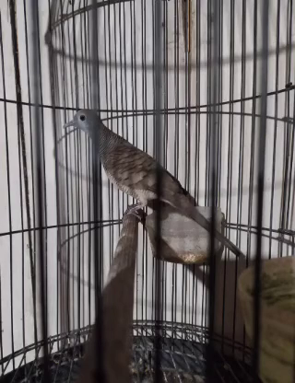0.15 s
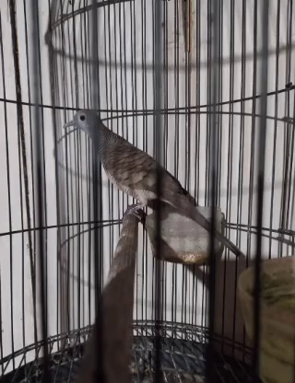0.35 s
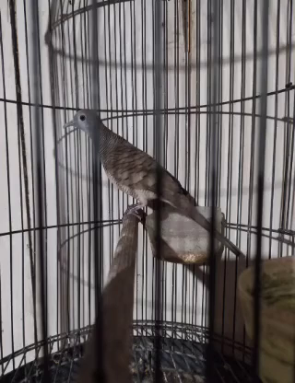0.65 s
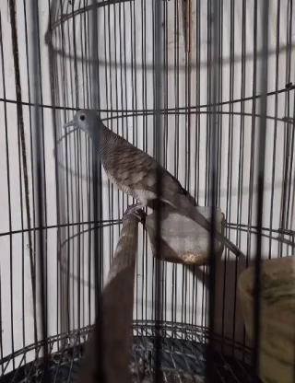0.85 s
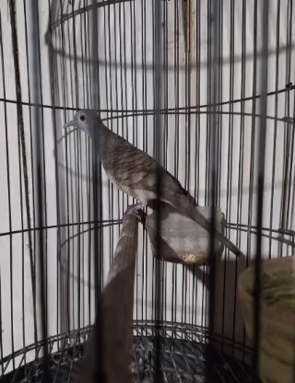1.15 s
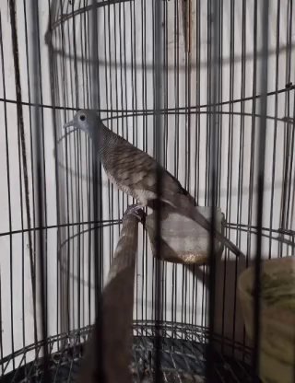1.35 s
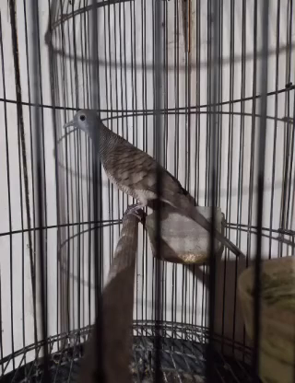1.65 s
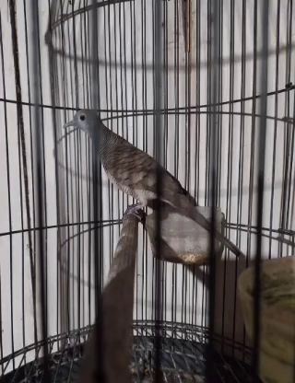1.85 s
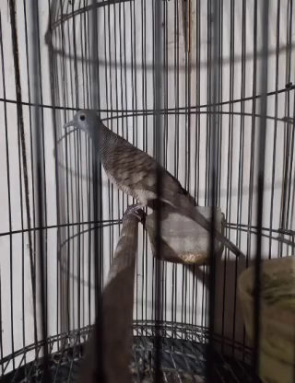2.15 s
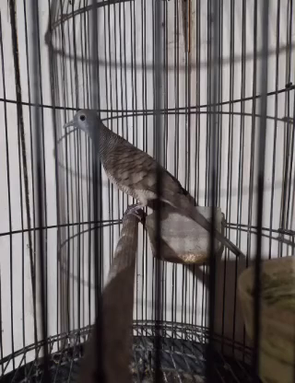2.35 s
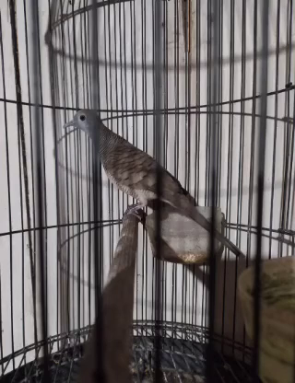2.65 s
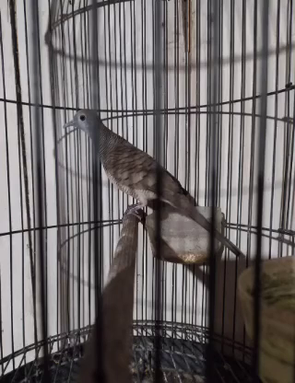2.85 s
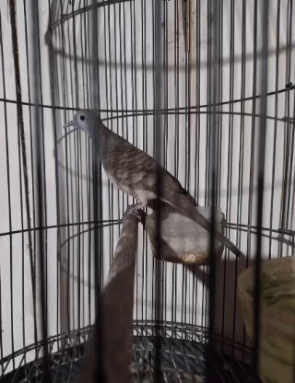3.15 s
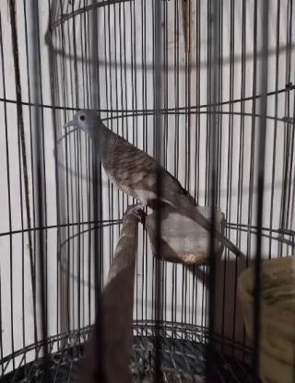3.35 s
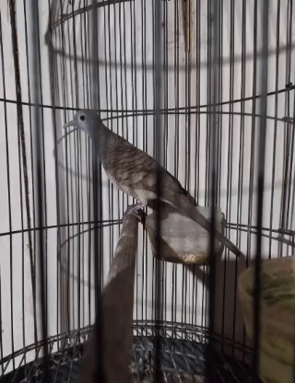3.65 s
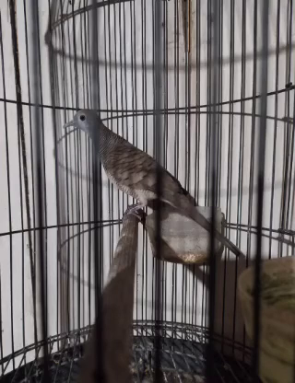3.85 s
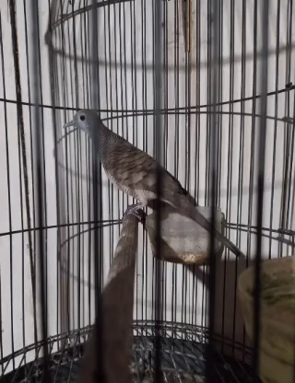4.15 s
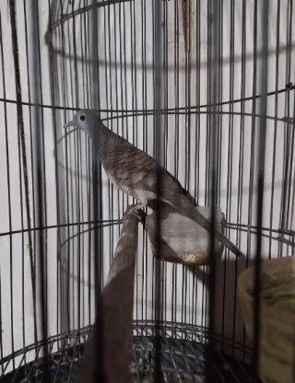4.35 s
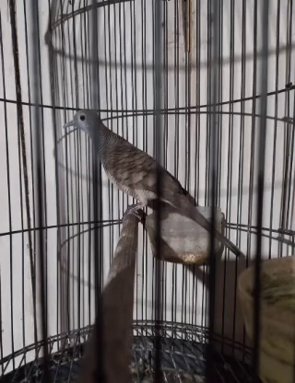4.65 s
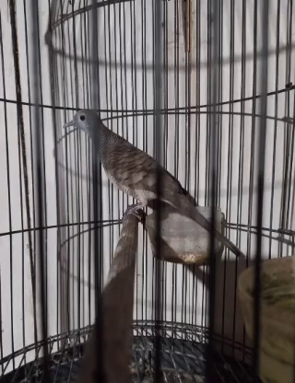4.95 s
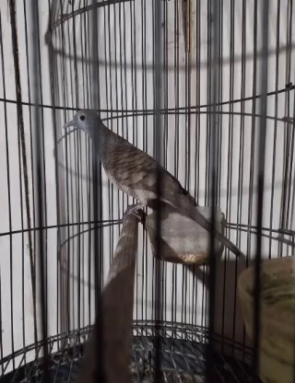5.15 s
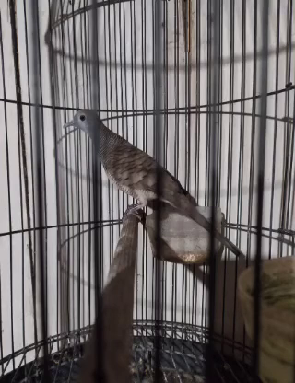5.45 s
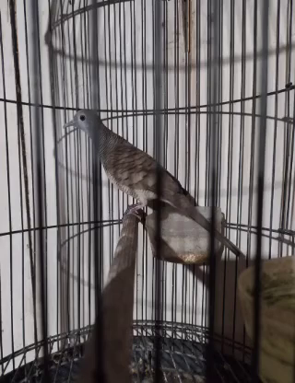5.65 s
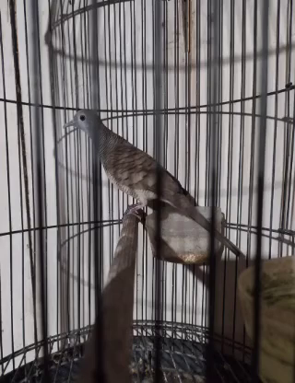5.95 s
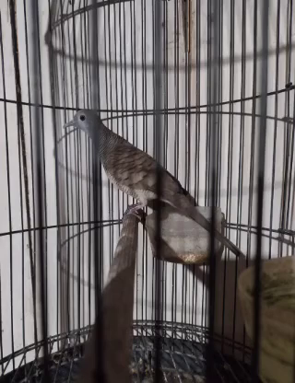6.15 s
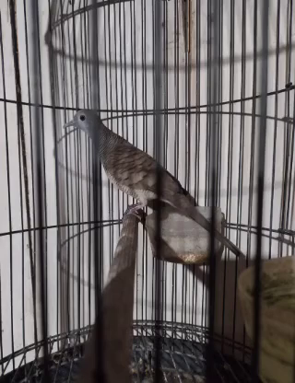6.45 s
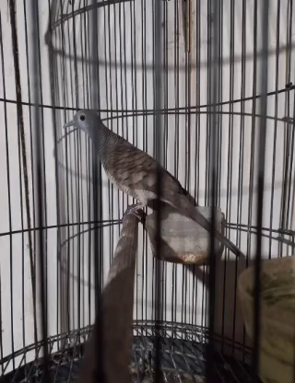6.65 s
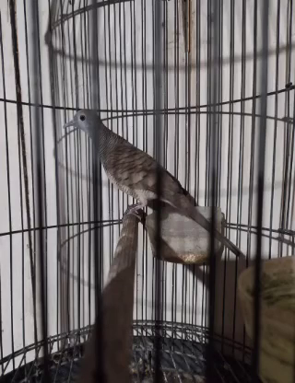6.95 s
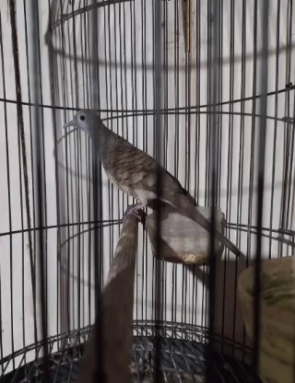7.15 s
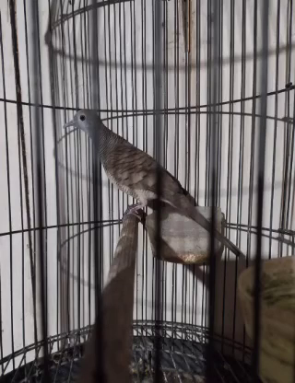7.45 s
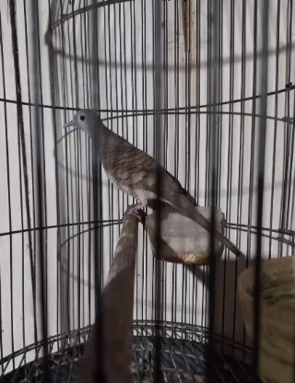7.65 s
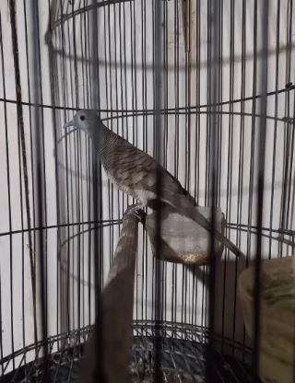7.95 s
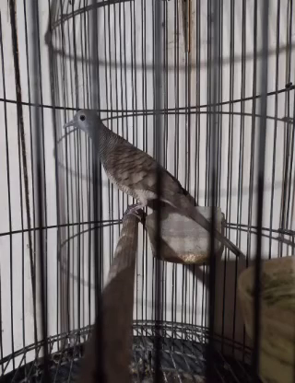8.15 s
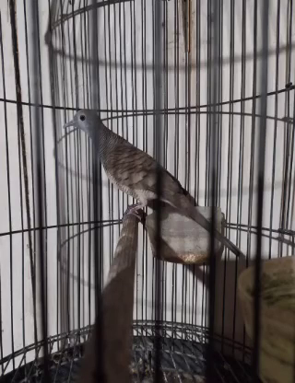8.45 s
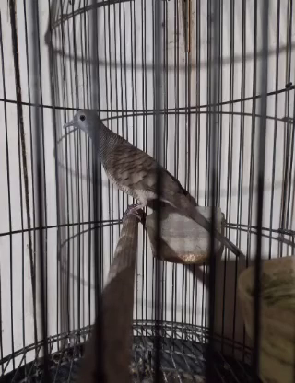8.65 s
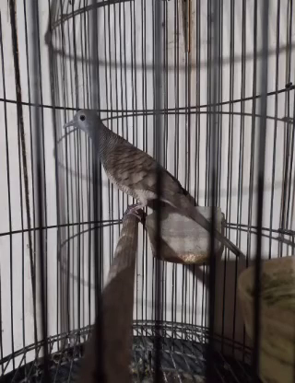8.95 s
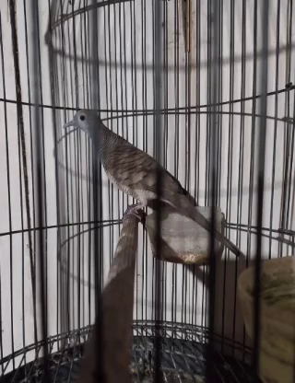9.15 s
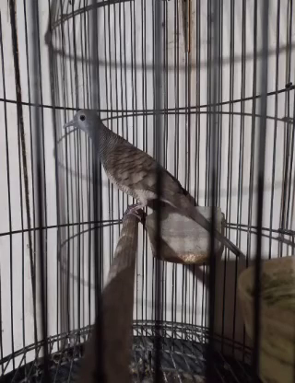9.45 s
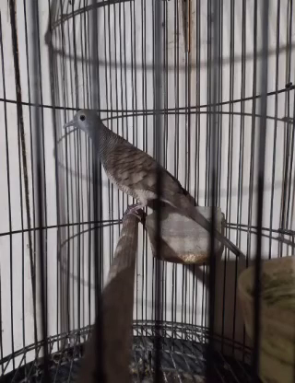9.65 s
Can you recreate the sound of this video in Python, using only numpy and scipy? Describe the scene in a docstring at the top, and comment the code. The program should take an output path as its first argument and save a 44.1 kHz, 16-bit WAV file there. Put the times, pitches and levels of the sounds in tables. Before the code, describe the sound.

A caged dove close by gives quick staccato coo phrases with rattling onsets and popping notes, while another dove answers faintly in a quiet room.

```python
"""In a quiet room, a caged zebra dove coos in staccato phrases close to the microphone.
In each coo, syrinx pulses speed up into a rattle, lock into a loud pop near 1 kHz, then break into an
arched whistle. Another dove answers from far off with softer whistles, each after a trace of rattle.
Filtered noise makes the low rumble, the hiss, a soft distant thud, a rattle's low ring and faint sounds.
A sine hums for a while, like a far motor."""
import sys
import numpy as np
from scipy import signal
from scipy.fft import rfft, irfft, next_fast_len
from scipy.io import wavfile
from scipy.ndimage import uniform_filter1d, minimum_filter1d, map_coordinates

SR = 44100
rng = np.random.default_rng(int(sys.argv[2]) if len(sys.argv) > 2 else 0)


def transcribe(u):
    """Save the signal u as a 16-bit wav file named by the first command-line argument.

    u: samples, shape (n,) or (channels, n), limited to [-1, 1]; the rate is SR.
    q: integer samples, one column per channel.
    """
    v = np.clip(np.atleast_2d(u).T, -1, 1)
    q = np.round(v * 32767).astype(np.int16)
    wavfile.write(sys.argv[1], SR, q)


N = 432621  # length in samples


def amp(db):
    """Turn decibels into an amplitude factor."""
    return 10 ** (np.asarray(db) / 20)


def unit(x):
    """Scale x to an rms of 1."""
    return x / np.sqrt(np.mean(x ** 2) + 1e-20)


def along(points, hz):
    """Read (f/Hz, value) points on a log frequency axis."""
    f, v = np.transpose(points)
    return np.interp(np.log(hz + 1), np.log(f + 1), v)


def curve(rows):
    """Turn (t/s, value) rows into one value per sample."""
    return np.interp(np.arange(N) / SR, *np.transpose(rows))


def wobble(rate, size):
    """A smooth random curve with this many random knots a second."""
    knots = rng.standard_normal(int(size * rate / SR) + 4)
    return map_coordinates(knots, [np.arange(size) * rate / SR])


def ramp(t, width):
    """A smooth step from 0 to 1, centred on t = 0."""
    return .5 + .5 * np.sin(np.pi * np.clip(t / width, -.5, .5))


def add(track, s, x):
    """Mix x into the track from time s on."""
    at = round(s * SR)
    x = x[max(-at, 0):N - at]
    start = max(at, 0)
    track[start:start + len(x)] += x


def filtered(x, response):
    """Filter x by a complex response of frequency."""
    m = next_fast_len(N + SR // 2)
    return irfft(rfft(x, m) * response(np.fft.rfftfreq(m, 1 / SR)), m)[..., :N]


def resonance(f, hz, width):
    """Response of one resonance: it passes most at its centre."""
    return 1j * f * width / (hz * hz - f * f + 1j * f * width)


# The near dove's coos: (t/s when the pop locks, whistle length/s, base whistle f/Hz)
COOS = [(-.087, 0.11, 1285), (0.102, .097, 1277), (0.303, 0.1, 1270), (0.518, .101, 1268),
        (0.993, 0.077, 1299), (1.097, 0.032, 1254), (1.155, .03, 1210), (1.234, 0.031, 1194),
        (1.331, 0.084, 1237), (2.203, 0.11, 1282), (2.321, .037, 1235), (2.388, 0.023, 1175),
        (2.465, 0.027, 1170), (2.558, 0.072, 1223), (3.529, .141, 1263), (3.705, 0.025, 1170),
        (3.778, .022, 1154), (3.868, .037, 1200), (4.005, 0.076, 1252), (5.844, 0.14, 1276),
        (6.01, 0.028, 1186), (6.082, 0.021, 1136), (6.167, 0.034, 1187), (6.292, 0.081, 1247),
        (7.916, .041, 1304), (7.993, .027, 1235), (8.042, 0.01, 1190), (8.1, 0.0022, 1090),
        (8.174, .003, 1076), (8.255, 0.014, 1147), (8.345, 0.043, 1220), (8.472, 0.083, 1265),
        (8.673, .1, 1273), (8.894, 0.11, 1273), (9.128, 0.12, 1269), (9.372, 0.1176, 1265),
        (9.608, 0.11, 1263)]
# Single syrinx pulses before some phrases: (t/s, peak level/dB before the mix)
LONE_PULSES = [(0.9374, -20), (2.1472, -17.5), (3.4722, -19.5), (5.7873, -21.5)]
# Throat: slack in the short phrases, tight in the long last one: (t/s, tension 0-1)
TENSION = [(7, 0.05), (7.8, 1), (8.7, 0.94), (9.7, 0.75)]
PHRASE_PAUSE_S = .25  # a longer rest makes the next coo a phrase opening
# The rattle grows with the rest before the coo
RATTLE_S, RATTLE_SHORTEST_S, RECOVER_S = .0135, .004, .025
POP_S, POP_HZ, POP_DB = .0078, 991, -0.76  # from a slack throat, before the changes below
# A phrase opens with a longer rattle and a longer, lower pop: factor, factor, shift in Hz
OPENING_RATTLE, OPENING_POP, OPENING_POP_HZ = 1.75, 2.1, -20
# Full tension draws both out (factors) and lifts the pop (Hz and dB)
TIGHT_RATTLE, TIGHT_OPENING_RATTLE, TIGHT_POP = 1.2, 1.4, 1.95
TIGHT_POP_HZ, TIGHT_POP_DB = 88, 0.6
# A tight pop is held longer when it runs straight on from the last coo: extra share, rest in s
SLURRED_POP, SLUR_S = .35, .005
# Only longer whistles follow a thump; the longer the whistle, the weaker the thump
THUMP_FROM_S, THUMP_FADE_S = .006, 0.097


def dove():
    """Syrinx pulses lock into a pop and break into a whistle; rest and tension shape each coo."""
    voice, last_end = np.zeros(N), COOS[0][0]
    for lock, length, hz in COOS:
        rest = max(lock - last_end - RATTLE_SHORTEST_S, 0)
        opening = int(rest > PHRASE_PAUSE_S)
        tension = np.clip(np.interp(lock, *np.transpose(TENSION)), 0, 1)

        rattle_s = RATTLE_S + (RATTLE_SHORTEST_S - RATTLE_S) * np.exp(-rest / RECOVER_S)
        rattle_s *= TIGHT_RATTLE ** tension
        rattle_s *= (OPENING_RATTLE * TIGHT_OPENING_RATTLE ** tension) ** opening
        add(voice, lock - rattle_s - .001, rattle(max(rattle_s - .001, .002), tension))

        slur = 1 + SLURRED_POP * tension * np.exp(-rest / SLUR_S)
        pop_s = POP_S * TIGHT_POP ** tension * OPENING_POP ** opening * slur
        pop_hz = POP_HZ + TIGHT_POP_HZ * tension + OPENING_POP_HZ * opening
        add(voice, lock - .002, pop(pop_s, pop_hz, POP_DB + TIGHT_POP_DB * tension, tension))

        thump_gain = tension * (length > THUMP_FROM_S) * np.exp(-length / THUMP_FADE_S)
        add(voice, lock + pop_s - .005, thump_gain * thump())
        add(voice, lock + pop_s - .001, coo_whistle(max(length, .003), hz, tension, opening))
        last_end = lock + pop_s + length
    for s, db in LONE_PULSES:
        add(voice, s, amp(db) * throat_ring(1010, width=130, body_db=-4.5))
    return voice


# How the inflated throat colours each pulse: (f/Hz, level/dB)
RATTLE_COLOUR = [(60, -16), (260, 7.5), (420, -1), (600, -2), (800, 2.5), (1000, 2), (1550, -3),
                 (1950, -16.5), (2700, -29), (3500, -28.5), (4600, -34.5), (6100, -26.5), (7200, -51.5),
                 (12000, -74.5)]


def throat_ring(ring_hz, width=300, body_db=0, size=2048):
    """The inflated throat rings after one pulse, never before it; the peak is 1."""
    f = np.fft.rfftfreq(size, 1 / SR)
    body = body_db * ramp(820 - f, 500) * ramp(f - 440, 160)
    gain = np.abs(resonance(f, ring_hz, width)) * amp(along(RATTLE_COLOUR, f) + body)
    # Folding the cepstrum turns the gain curve into a minimum-phase ring
    cepstrum = irfft(np.log(gain + 1e-6))
    cepstrum[1:size // 2] *= 2
    cepstrum[size // 2 + 1:] = 0
    ring = irfft(np.exp(rfft(cepstrum)))
    return ring / np.abs(ring).max()


def rattle(length, tension, slack_hz=205, tight_hz=290, last_hz=800, first_db=-18.0, last_db=-7,
           sweep_db=-24, scatter=.1, lead=.002):
    """Pulses come ever faster and tend to grow stronger; the last one starts the locked tone."""
    u = np.linspace(0, 1, int(length * SR))
    first_hz = slack_hz + (tight_hz - slack_hz) * tension
    rate = first_hz * (last_hz / first_hz) ** (u ** 1.7) * np.exp(scatter * wobble(300, len(u)))
    cycles = np.cumsum(rate) / SR
    # Stretch to a whole number of cycles, so that a pulse falls at the end
    count = max(round(cycles[-1]), 1)
    cycles = cycles * count / cycles[-1]
    at = np.minimum(np.searchsorted(cycles, np.arange(count + 1)), len(u) - 1)
    pulses = np.zeros(len(u))
    pulse_db = first_db + (last_db - first_db) * np.sqrt(u[at]) - 5.2 * tension
    pulses[at] = amp(pulse_db + rng.normal(0, 3.6, len(at)))
    ring = throat_ring(970 + 170 * tension, width=260 + 80 * tension, body_db=-9 * tension)
    delay = max(int(lead * SR) - np.argmax(ring), 0)
    out = np.pad(signal.fftconvolve(pulses, ring), (delay, 0))
    sweep = amp(sweep_db - 36 * tension) * u ** 2 * ramp(.92 - u, 0.18)
    out[int(lead * SR):][:len(u)] += sweep * np.cos(2 * np.pi * cycles)
    return out


# Overtones of the pop: (harmonic number, level/dB from a slack throat, level/dB from a tight throat)
POP_ORDERS = [(2, -38.5, -32.5), (3, -52.5, -43), (4, -59.5, -54.5), (5, -59.5, -59.5), (6, -59.5, -72)]


def pop(length, hz, db, tension, glide=.17, tight_glide=.09, sag_db=2.0, rough_db=3, lead=.002):
    """The pulses lock into one short, loud tone that rises in pitch."""
    t = np.arange(int((length + 2 * lead) * SR)) / SR - lead
    rise = glide + (tight_glide - glide) * tension
    pitch = hz * (1 + rise * (t / length - .5) + .008 * wobble(350, len(t)))
    phase = 2 * np.pi * np.cumsum(pitch) / SR
    phase = phase - phase[int(lead * SR)]
    gate = ramp(t - .0015, .005) * ramp(length - .0006 - t, 0.0046)
    swell = gate * amp(db - .5 - sag_db * np.clip(t / 0.01 - .4, 0, 1))
    tone = np.cos(phase)
    for k, slack_db, tight_db in POP_ORDERS:
        level = amp(slack_db + (tight_db - slack_db) * tension + rough_db * wobble(300, len(t)))
        tone += level * np.sin(k * phase + 1.1 * wobble(400, len(t)))
    return swell * tone


# Full effort needs this length; whistles shorter than CHOKED_S are weakened
FULL_WHISTLE_S, CHOKED_S = .095, .006
# Short-whistle level, gain at full effort, change under full tension
WHISTLE_DB, EFFORT_DB, TIGHT_DB = -10, 1, -2.5
# Level change towards the end: base, added by full effort, added by effort and tension together
SWELL_DB, EFFORT_SWELL_DB, TIGHT_SWELL_DB = -2.5, 3, 7
SAG, TIGHT_SAG = .04, 0.032  # share by which the pitch sinks; the tight one at full effort
# Overtones gain level as the base pitch falls below the bright pitch
OVERTONE_DB, OVERTONE_RISE_DB_PER_HZ, BRIGHT_HZ = -43, 0.01, 1263
TIGHT_OVERTONE_DB, WEAK_OVERTONE_DB = -5, -5  # tension weakens them, most in short whistles
THROB_FROM_S = .09  # opening whistles longer than this throb


def coo_whistle(length, hz, tension, opening):
    """Longer whistles are blown harder, which changes their level, swell and overtones."""
    effort = min(length / FULL_WHISTLE_S, 1)
    choke_db = 20 * np.log10(min(length / CHOKED_S, 1))
    db = WHISTLE_DB + EFFORT_DB * effort + TIGHT_DB * tension + choke_db
    swell_db = SWELL_DB + effort * (EFFORT_SWELL_DB + TIGHT_SWELL_DB * tension)
    sag = SAG * (1 - tension) + TIGHT_SAG * tension * effort
    overtone_db = OVERTONE_DB + OVERTONE_RISE_DB_PER_HZ * max(BRIGHT_HZ - hz, 0)
    overtone_db += tension * (TIGHT_OVERTONE_DB + WEAK_OVERTONE_DB * (1 - effort))
    throb = float(opening and length > THROB_FROM_S)
    return whistle(length, hz, hz * (1 - sag), db, db + swell_db, overtone_db, throb, tension)


# What throat and beak pass of the overtones: (f/Hz, level/dB against the overtone level)
BEAK = [(2200, -9.5), (2400, 1), (2560, 7.5), (2800, -1), (3400, -2), (3800, -2), (4600, -14.5),
        (5050, -10), (5700, -3), (6250, -6), (6900, -22), (7600, -21.5), (8600, -21.5), (11000, -36.5)]
OVERTONE_SWELL = 0.92  # share of the level changes that a fully tight whistle's overtones follow


def whistle(length, top_hz, late_hz, db, late_db, overtone_db, throb, tension, hump=.012, scoop=.035,
            droop=0.13, tight_droop=0.11, throb_hz=22, jitter=0.0024, rough=.2, dull_db=7,
            swell_s=.016, count=9):
    """A clean arched tone scoops up, sinks slowly and droops as the air runs out."""
    t = np.arange(int((length + .005) * SR)) / SR
    late = length - min(.017, 0.26 * length)
    crest = .25 * length
    arch = top_hz + (late_hz - top_hz) * np.clip((t - crest) / (late - crest), 0, 1.25) ** 1.8
    end_droop = droop + (tight_droop - droop) * tension
    ends = 1 - scoop * np.exp(-t / (.09 * length))
    ends -= end_droop * np.exp(np.minimum(t - length, 0) / .0048)
    # Throbbing coos dip in pitch and level
    dip = throb * (np.sin(np.pi * throb_hz * (t - late + 0.0035)) ** 4 - .3)
    waver = jitter * wobble(300, len(t)) + .003 * wobble(45, len(t))
    bow = hump * (1 - tension) * (np.sin(np.pi * t / length) - .5)
    hz = arch * ends * (1 + bow + .007 * tension - .04 * dip + waver)
    phase = 2 * np.pi * np.cumsum(hz) / SR

    gate = ramp(t - .001, 0.0044) * ramp(length - .002 - t, 0.0072)
    late_swell = (late_db - db) * ramp(t - late + 0.01 * tension + 0.0026, swell_s)
    effort_db = db - 6.3 * np.exp(-t / (0.17 * late)) + late_swell - 2.2 * dip
    flutter_db = (.12 + .25 * tension) * wobble(400, len(t))
    flutter_db += (.4 + .5 * tension) * wobble(50, len(t))

    overtones = np.zeros(len(t))
    for k in range(2, count + 1):
        dulling = dull_db * tension * ramp(k * hz - 5000, 2500) * ramp(8200 - k * hz, 1500)
        level_db = overtone_db + along(BEAK, k * hz) - 5.5 * dip - dulling + 1.7 * wobble(250, len(t))
        overtones += amp(level_db) * np.sin(k * phase + rough * wobble(230, len(t)))
    bright = ramp(t - .0008, .22 * length) * ramp(length - .0105 - t, 0.018)
    bright *= amp(OVERTONE_SWELL * tension * (effort_db - db - 2.0))
    return gate * (amp(effort_db + flutter_db) * np.sin(phase) + bright * overtones)


THUMP_DB, THUMP_HZ, THUMP_S = -29, 68, .012  # start level before the dove's scaling, pitch, decay


def thump():
    """A low push of air swings back and forth and dies."""
    t = np.arange(SR // 8) / SR
    return amp(THUMP_DB) * np.sin(2 * np.pi * THUMP_HZ * t) * np.exp(-t / THUMP_S)


def cage(x, delay=.0007, corner_hz=4000):
    """The thin bars scatter mostly treble, with opposite sign at the two microphone ports."""
    def bars(f):
        return f * f / (f * f + corner_hz ** 2) * np.exp(-2j * np.pi * f * delay)

    scattered = filtered(x, bars)
    return np.array([scattered, -scattered])


# The far dove: (start t/s, length/s, base f/Hz, level/dB before flutter and the mix)
FAR_COOS = [(1.506, 0.048, 1119, -28.5), (1.598, 0.027, 1110, -41), (1.652, 0.032, 1132, -32),
            (1.718, 0.033, 1114, -28.5), (1.803, .028, 1140, -27), (1.895, 0.049, 1155, -24),
            (2.019, 0.082, 1142, -25)]
FAR_RATTLE_S, FAR_RATTLE_DB = .024, -30.5  # length; gain on the near dove's slack rattle


def far_dove(bend=0.077):
    """From a distance the arched whistles carry, with a trace of the rattle before each."""
    voice = np.zeros(N)
    for s, length, hz, db in FAR_COOS:
        u = np.linspace(-1, 1, int(length * SR))
        phase = 2 * np.pi * np.cumsum(hz * (1 - bend * (u * u - .15))) / SR
        add(voice, s, amp(db + 1.5 * wobble(120, len(u))) * (1 - u * u) * np.sin(phase))
        add(voice, s - FAR_RATTLE_S + 0.0033, amp(FAR_RATTLE_DB) * rattle(FAR_RATTLE_S, 0))
    return voice


# How long the room rings: (f/Hz, time to fall by 60 dB/s)
ROOM = [(200, .25), (900, .24), (1060, 0.37), (1240, .32), (3000, 0.1), (8000, 0.23)]


def room(x, gap=.004, spread=.25):
    """The walls return a short diffuse tail, similar at both microphone ports."""
    hz, t, z = signal.stft(rng.standard_normal((2, SR // 2)), SR, nperseg=256)
    fading = z * amp(-60 * t / along(ROOM, hz)[:, None])
    tail = signal.istft(fading, SR, nperseg=256)[1]
    tail = np.pad(tail / np.linalg.norm(tail[0]), ((0, 0), (int(gap * SR), 0)))
    mid, side = signal.fftconvolve(x[None], tail, axes=1)[:, :N]
    return np.array([mid + spread * side, mid - spread * side])


# Faint rustles, murmurs, ticks, a thud and, at 7.87 s, the low ring of the near dove's opening rattle:
# (start t/s, rise/s, fall by 60 dB/s, centre f/Hz, width f/Hz, level/dB)
MURK = [(1.47, .05, 5.46, 2000, 793, -58.5), (2.63, 0.07, 0.81, 510, 70, -45),
        (2.64, .02, .35, 144, 40, -40.5), (2.8, 0.31, 1.064, 2693, 1800, -64),
        (3.25, .003, 0.11, 7540, 2500, -64.5), (4.14, 0.062, 0.87, 459, 110, -41.5),
        (4.63, .04, 0.89, 750, 800, -38), (5.4, .3, .6, 1694, 1400, -58.5),
        (7.497, 0.0039, 0.11, 5450, 2000, -63.5), (7.87, .03, 0.42, 310.5, 90, -38.5),
        (9.03, 0.018, 0.23, 1700, 60, -38)]


def murk():
    """Bands of noise swell and die away as faint sounds and a rattle's low ring."""
    t, out = np.arange(N) / SR, np.zeros(N)
    for s, rise, fall, hz, width, db in MURK:
        def band_shape(f):
            return resonance(f, hz, width) ** 2 / (1 + (f / (hz + 3 * width)) ** 4)

        band = unit(filtered(rng.standard_normal(N), band_shape))
        fading = amp(db - 60 * np.maximum(t - s - rise, 0) / fall)
        out += band * ramp(t - s - rise / 2, rise) * fading
    return out


# How alike left and right are: (f/Hz, likeness 0-1)
ALIKE = [(100, 0.99), (1000, 0.98), (3000, 0.25), (8000, 0.3)]


def rush(spectrum):
    """Stereo noise of rms 1, nearly mono in the bass."""
    def mid_side(f):
        turn = np.arccos(np.clip(along(ALIKE, f), -1, 1)) / 2
        return amp(along(spectrum, f)) * [np.cos(turn), np.sin(turn)]

    mid, side = filtered(rng.standard_normal((2, N)), mid_side)
    return unit(np.array([mid + side, mid - side]))


# Rumble over time: (t/s, level/dB before the lift and wobble below)
AMBIENCE = [(0, -53), (2.3, -52.5), (3.5, -55), (6.7, -56.5), (7.2, -54), (7.55, -51), (8.4, -51),
            (9.81, -52)]
# Colour of the rumble: (f/Hz, relative level/dB per Hz)
RUMBLE = [(12, -44), (22, -21), (45, -6), (120, 1), (180, -3), (300, -7.5), (420, -13), (600, -25),
          (1200, -69.5)]
# Colour of the hiss: (f/Hz, relative level/dB per Hz)
AIR = [(200, -10.5), (380, -1.5), (550, -2.5), (750, -6.5), (1100, -9), (1600, -12), (2400, -17),
       (3300, -22.5), (5000, -30), (8500, -35.5), (10500, -46), (14000, -68)]
# Hum of the far motor over time: (t/s, peak level/dB before the wobble)
HUM = [(0, -55), (.3, -47), (.9, -42.5), (1.4, -49.5), (1.9, -59), (3, -70.5)]
AIR_DB = -53  # hiss level before the wobble


def background(hum_hz=149):
    """Noise makes the rumble and hiss from outside; a wavering sine is a far motor's hum."""
    rumble = amp(curve(AMBIENCE) + 5.5 + 2.4 * wobble(8, N)) * rush(RUMBLE)
    air = amp(AIR_DB + 1.3 * wobble(6, N)) * rush(AIR)
    hum_phase = 2 * np.pi * np.cumsum(hum_hz + 0.53 * wobble(3, N)) / SR
    hum = amp(curve(HUM) + 1.7 * wobble(8, N)) * np.sin(hum_phase)
    return rumble + air + hum


# The long last phrase stirs the room more: (t/s, near dove's echo send level/dB)
ECHO = [(7, -18), (7.8, -14), (9.81, -17)]
ROOM_TREBLE_DB, ROOM_TREBLE_HZ = 4, 2210  # the near dove's overtones reach the walls more strongly


def scene():
    """Both doves sound in the room, over the faint sounds and the background."""
    near, far = dove(), far_dove()
    spilled = filtered(near, lambda f: amp(ROOM_TREBLE_DB * ramp(f - ROOM_TREBLE_HZ, 800)))
    echoes = room(amp(curve(ECHO)) * spilled + amp(-11.5) * far, gap=.002)
    birds = near + amp(-9) * cage(near, delay=0.00038) + far + echoes
    # The birds are slightly louder in the first channel than in the second
    return birds * amp([[.7], [-.7]]) + murk() + background()


TOP_HZ = 11000  # band limit


def record(dry, ceiling=0.87, hold=.003):
    """A fast limiter holds down the loudest peaks; a steep filter cuts above the band limit."""
    size = int(hold * SR)
    needed = np.minimum(1, ceiling / (np.abs(dry).max(0) + 1e-9))
    gain = uniform_filter1d(minimum_filter1d(needed, 2 * size), size)
    return filtered(dry * gain, lambda f: 1 / (1 + (f / TOP_HZ) ** 40))


dry = scene()
out = record(dry)
transcribe(out)
```